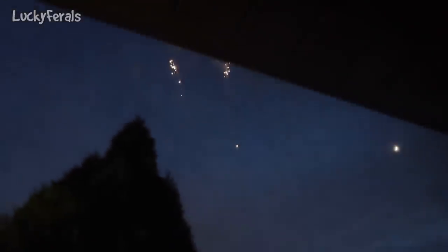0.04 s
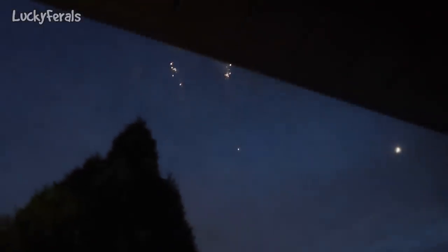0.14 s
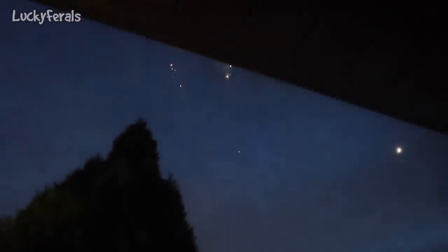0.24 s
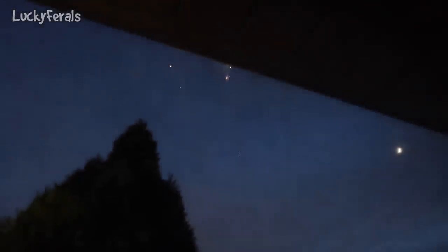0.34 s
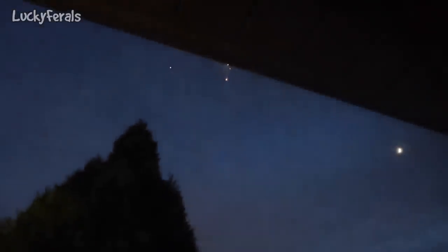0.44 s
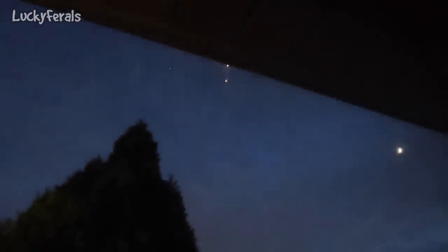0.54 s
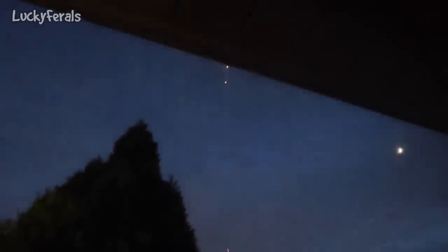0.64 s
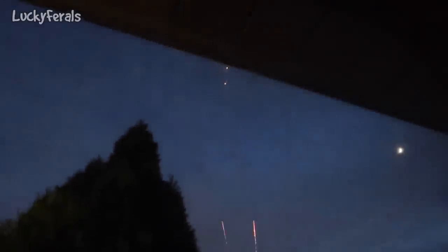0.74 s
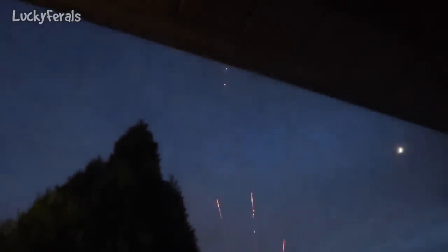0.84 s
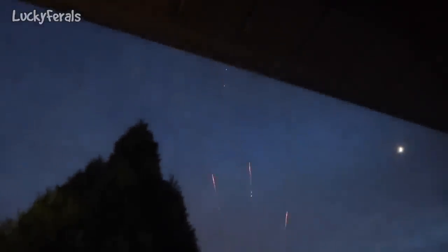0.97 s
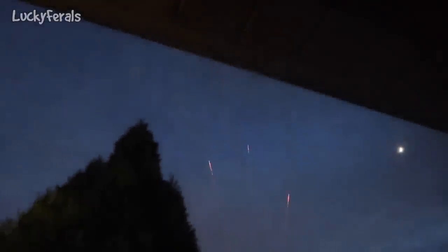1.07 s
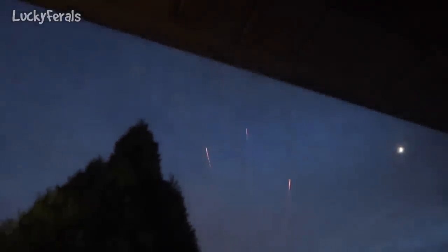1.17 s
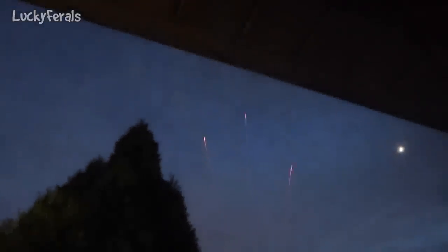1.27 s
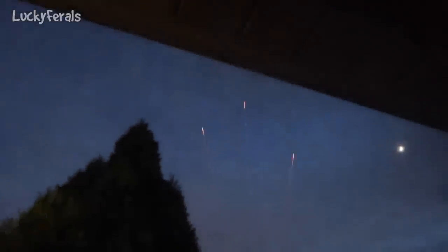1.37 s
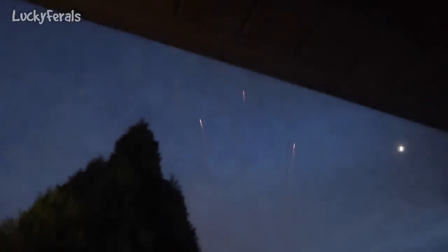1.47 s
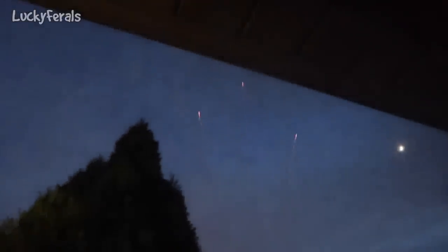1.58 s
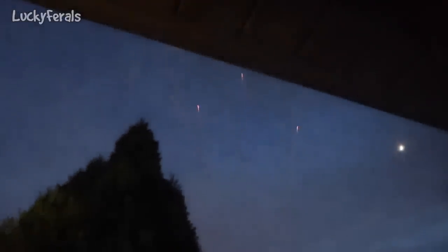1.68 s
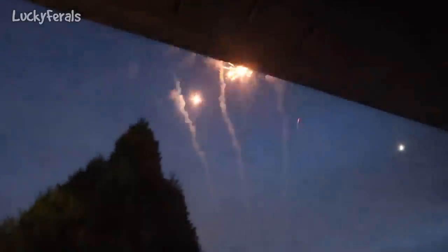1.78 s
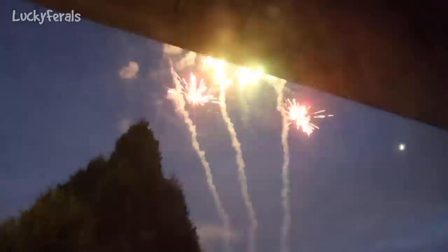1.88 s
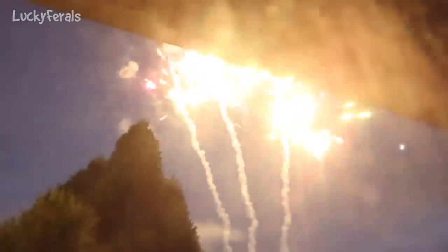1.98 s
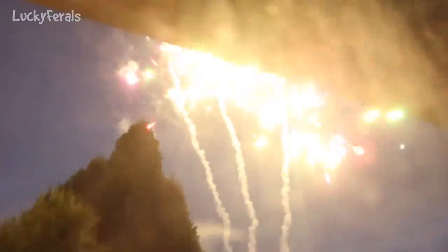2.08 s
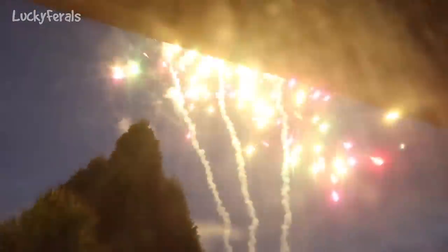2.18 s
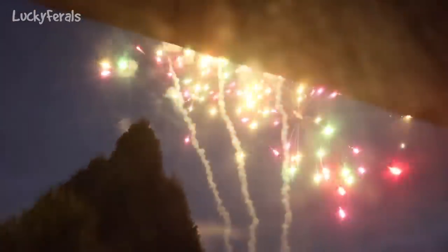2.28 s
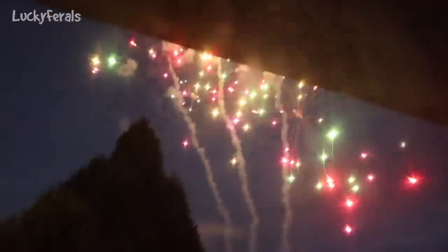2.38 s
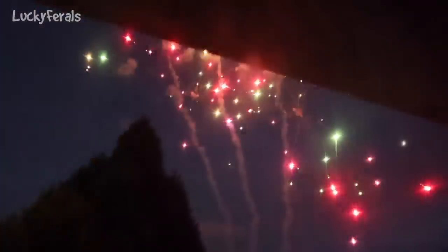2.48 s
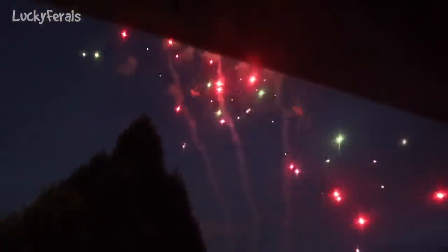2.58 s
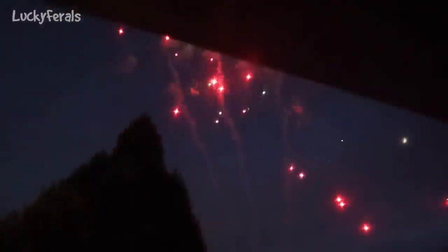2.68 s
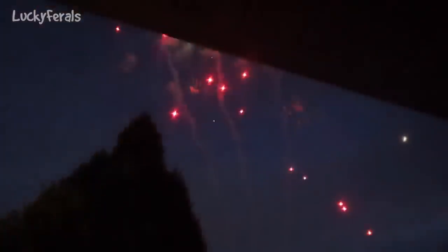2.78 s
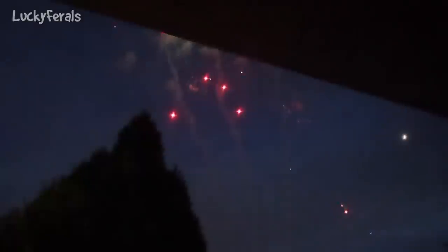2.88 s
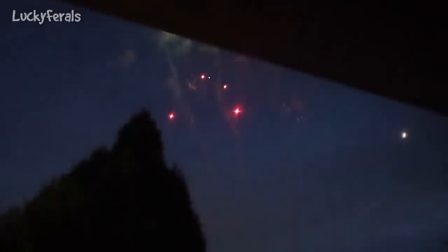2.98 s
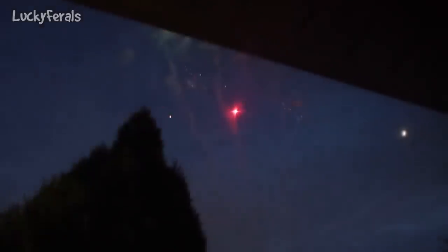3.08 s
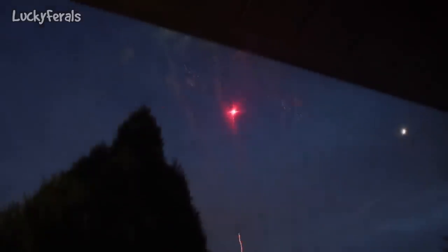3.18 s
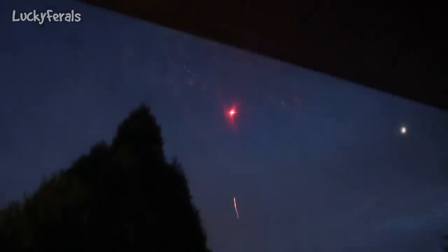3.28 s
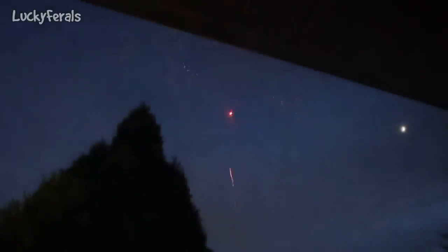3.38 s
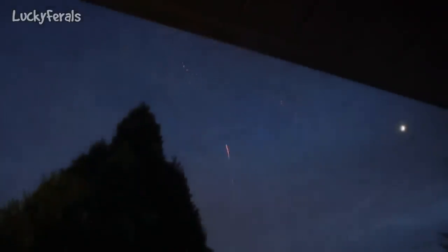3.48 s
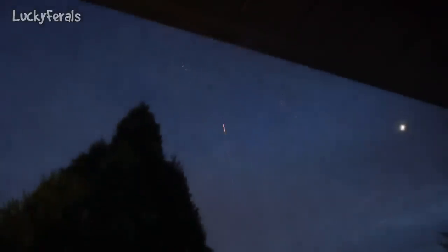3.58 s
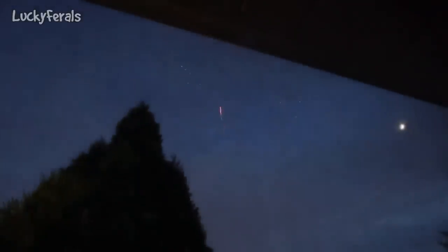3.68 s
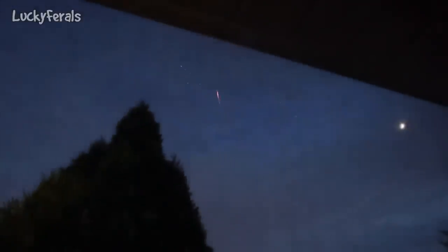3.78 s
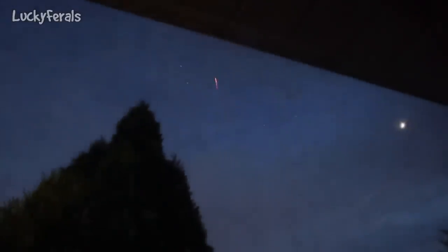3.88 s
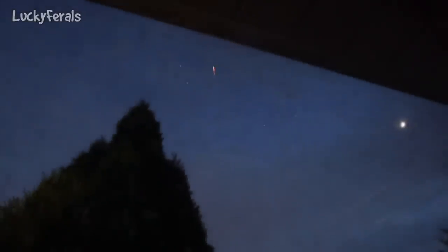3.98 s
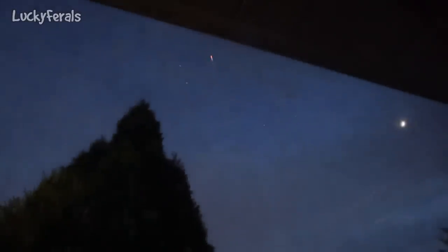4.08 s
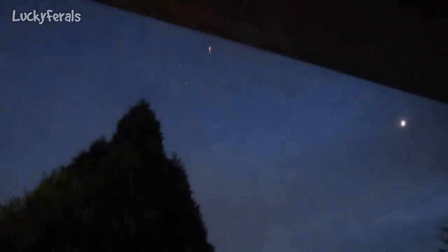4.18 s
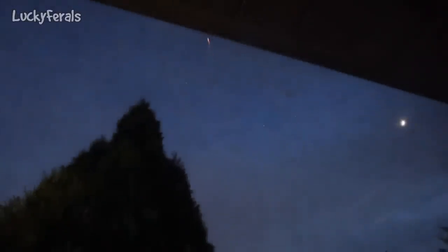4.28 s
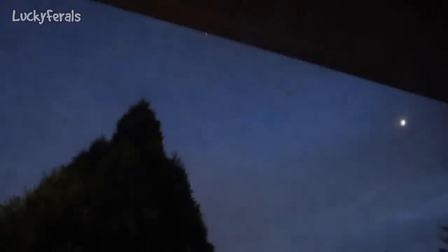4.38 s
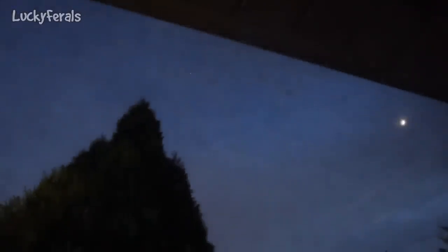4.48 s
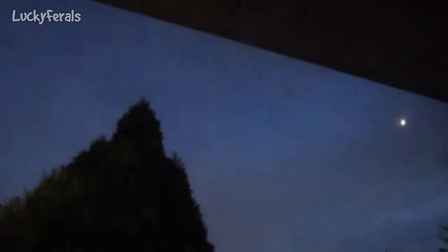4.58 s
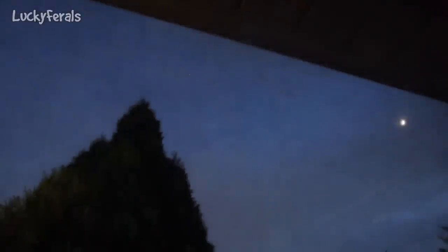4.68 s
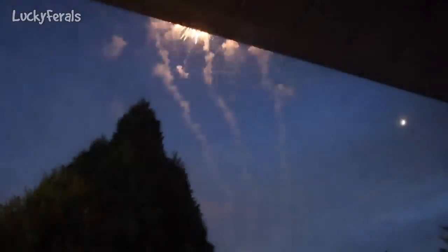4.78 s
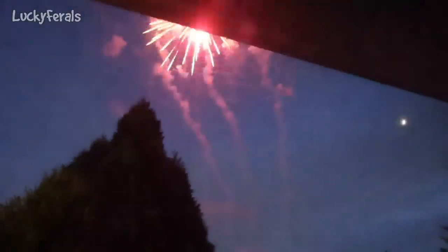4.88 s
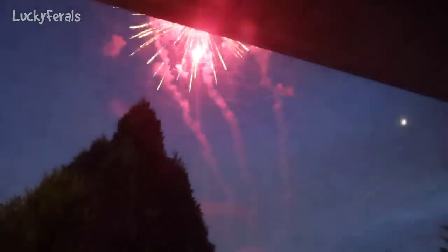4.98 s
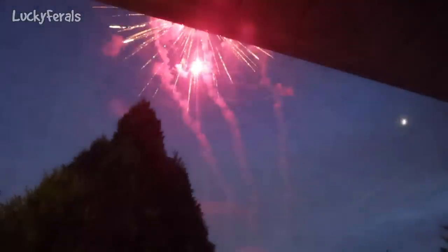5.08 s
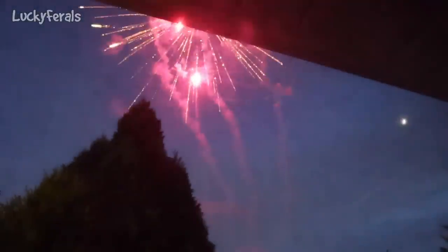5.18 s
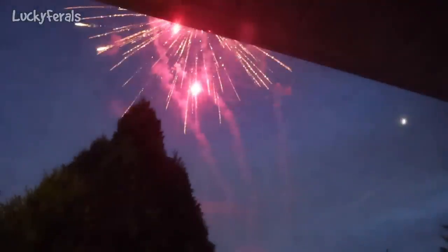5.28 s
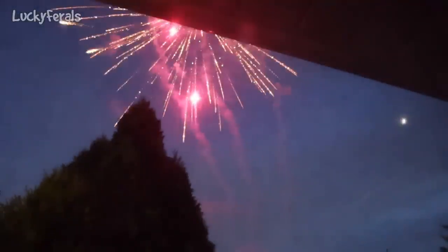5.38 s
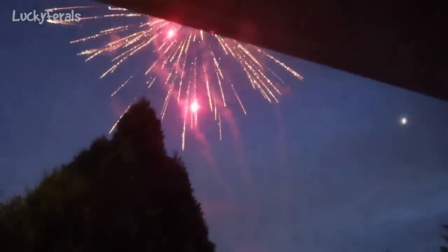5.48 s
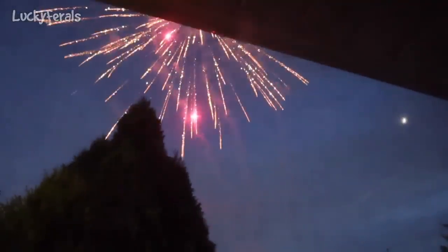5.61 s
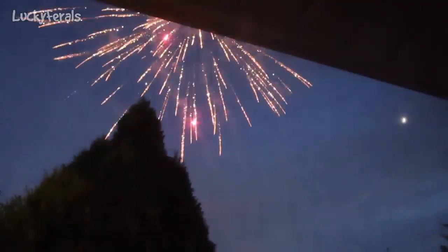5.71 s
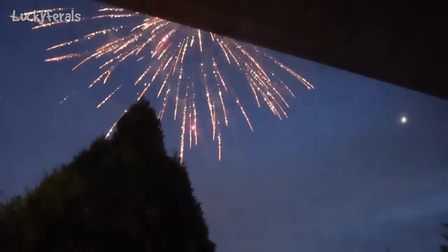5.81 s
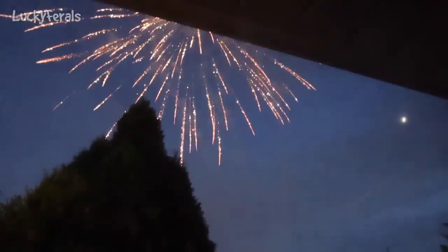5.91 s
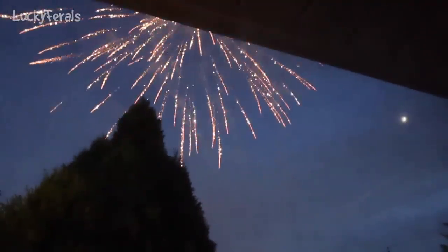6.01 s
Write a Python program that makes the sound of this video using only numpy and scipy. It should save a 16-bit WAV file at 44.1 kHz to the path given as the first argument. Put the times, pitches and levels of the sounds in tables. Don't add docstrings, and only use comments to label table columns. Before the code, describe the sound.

Night fireworks heard from a porch: dull mortar thuds, a sharp twin blast, later a single huge crack, with booming echoes over faint hum and insect ticking.

```python
import sys
import numpy as np
from scipy import signal
from scipy.fft import rfft, irfft
from scipy.io import wavfile
from scipy.ndimage import uniform_filter1d

SR = 44100
rng = np.random.default_rng(int(sys.argv[2]) if len(sys.argv) > 2 else 0)


def wrap_up_sound(samples):
    columns = np.atleast_2d(samples).T
    tamed = np.clip(columns, -1, 1)
    steps = np.round(tamed * 32767).astype(np.int16)
    wavfile.write(sys.argv[1], SR, steps)


def level_to_linear(level):
    exponent = np.asarray(level, float) / 20
    return 10 ** exponent


N = 266805


def evened(x):
    return x / np.sqrt(np.mean(x ** 2) + 1e-20)


def steady(x, size):
    return x / np.sqrt(uniform_filter1d((x ** 2).mean(0), size) + 1e-20)


def smoothed_noise(shape, size, axis=-1):
    return uniform_filter1d(rng.standard_normal(shape), size=size, axis=axis)


def read(points, hz):
    f, value = np.transpose(points)
    return np.interp(np.log(hz + 1), np.log(f + 1), value)


def add(mix, start_s, sound):
    part = mix[..., round(start_s * SR):][..., :sound.shape[-1]]
    part += sound[..., :part.shape[-1]]


def modes(hz, table):
    total = 0
    for k, (f, width, db) in enumerate(table):
        resonance = 1j * hz * width / (f ** 2 - hz ** 2 + 1j * hz * width)
        total = total + (-1) ** k * level_to_linear(db) * resonance
    return total


def lifted(hz, table):
    return np.sqrt(1 + sum(abs(modes(hz, [mode])) ** 2 for mode in table))


def ports(a, b, same, lean, turn=((1, 0), (2, 0))):
    hz = np.fft.rfftfreq(len(a), 1 / SR)
    likeness = np.clip(read(same, hz), -1, 1)
    apart = hz ** 2 / (hz ** 2 + 450 ** 2)
    left = rfft(a)
    right = likeness * left + np.sqrt(1 - likeness ** 2) * rfft(b)
    right = right * np.exp(-1j * apart * read(turn, hz))
    return hz, np.array([left, right]) * level_to_linear(np.outer([.5, -.5], apart * read(lean, hz)))


# pitch_hz, level_db per Hz
NIGHT_COLOUR = [(15, -27), (28, -0.5), (130, -3), (200, -9.5), (560, -15), (3500, -25), (14500, -42.5),
                (16000, -43)]
# pitch_hz, likeness
NIGHT_LIKENESS = [(60, 1), (150, 0.93), (380, 0.16), (950, 0.015), (2380, 0.14), (5980, 0.53),
                  (15000, 0.35)]
# pitch_hz, left_minus_right_db
NIGHT_BALANCE = [(60, -8), (240, 1), (950, 0.5), (3770, 0), (15000, 0.0)]
# pitch_hz, width_hz, level_db
PORCH_HUM_MODES = [(105.4, 31, 6.5), (143, 50, -7.5), (220.7, 18, 8.5), (310, 25, 11), (405, 12, 9.5)]


def night(hum_db=-42.5, swell_db=1.5, hiss_db=-48.5):
    hz, z = ports(*rng.standard_normal((2, N)), NIGHT_LIKENESS, NIGHT_BALANCE)
    z = z * level_to_linear(read(NIGHT_COLOUR, hz)) * lifted(hz, PORCH_HUM_MODES)
    low = 1 / (1 + (hz / 450) ** 4)
    swell = evened(uniform_filter1d(smoothed_noise(N, 3000), size=3000))
    hum = steady(irfft(z * low, N), size=9000) * level_to_linear(hum_db + swell_db * swell)
    hiss = evened(irfft(z * (1 - low), N)) * level_to_linear(hiss_db)
    return hum + hiss


# start_s, pairs
PAIR_RUNS = [
    (.883, 6),
    (3.352, 1),
    (4.285, 2),
    (4.853, 11),
]
LIMP_S = np.array([0, .044, .12, .176, .225, .275])
# start_s, ticks
LIMPS = [(-.089, 6), (.276, 4), (.722, 1), (1.51, 2), (1.644, 4), (1.897, 1), (2.422, 1), (2.511, 2),
         (2.745, 3), (2.879, 4), (3.479, 6), (3.815, 2), (3.946, 6), (4.514, 6)]


def insect(level_db=-45.5, spread_db=2, pair_gap_s=.038, pair_every_s=.1003):
    t = np.arange(400) / SR
    turn = np.array([[2.1], [0]])
    tone = np.sin(2 * np.pi * 4365 * t + turn)
    tone = tone + level_to_linear(-10.5) * np.sin(2 * np.pi * 3410 * t + turn)
    click = tone * np.exp(-((t * 1000 - 4) / 1.63) ** 2)
    times = []
    for start, pairs in PAIR_RUNS:
        for k in range(pairs):
            times += [start + k * pair_every_s, start + k * pair_every_s + pair_gap_s]
    for start, ticks in LIMPS:
        times += [start + after for after in LIMP_S[:ticks] if start + after > 0]
    out = np.zeros((2, N))
    for s in times:
        add(out, s - .0047, level_to_linear(level_db + spread_db * rng.standard_normal()) * click)
    return out * level_to_linear([[1.5], [-1.5]])


def front(db, push_ms, soft_ms, lead_ms=0.1, swings=1.63):
    ms = np.arange(-40, 900) * 1000 / SR

    def wave(at_ms):
        u = np.maximum(at_ms, 0) / push_ms
        swing = np.cos(np.pi / 2 * u) * np.exp(-u / swings)
        return -swing * (1 + np.tanh(at_ms / soft_ms)) / 2

    shares = (0.55, -0.0051)
    return level_to_linear(db) * np.array([(1 + k) * wave(ms) - k * wave(ms + lead_ms) for k in shares])


# start_s, peak_db, push_ms, softness_ms
FRONTS = [(1.9676, 12, 1.08, 0.088), (1.9710, -6, 0.66, 0.064), (1.981, -9, 0.63, 0.084),
          (2.0496, 10, 1.1, 0.063), (2.0547, 2.5, 2.2, 0.17), (2.063, -19, 1.2, 0.2),
          (5.0022, 18.5, 1.48, 0.071), (5.0218, -10, 0.45, 0.13), (0.4942, -7, 1.4, 0.72),
          (0.5423, -15, 0.93, 0.22), (3.1033, -8.5, 1.5, 0.72), (3.113, -12, 1.05, 0.27),
          (2.468, -23, 1.2, 0.17)]


def blasts():
    out = np.zeros((2, N))
    for s, *shape in FRONTS:
        add(out, s - 40 / SR, front(*shape))
    return out


# start_s, level_db, pitch_hz, t60_s
TUBES = [(0.498, -26, 2320, 0.064), (.543, -23, 2280, 0.065), (.545, -30, 2020, 0.082),
         (.575, -27, 2300, 0.076), (0.651, -33, 3100, .08), (3.109, -24.5, 2860, 0.11),
         (3.109, -25.5, 4250, 0.088), (3.111, -33, 5470, 0.033), (3.177, -18.5, 1395, 0.09),
         (3.27, -26.5, 1250, 0.038), (4.345, -32.5, 405, 0.26), (4.345, -38, 310, 0.36),
         (5.02, -24.5, 3080, 0.031)]


def tubes():
    out, t = np.zeros((2, N)), np.arange(6000) / SR
    for s, db, hz, t60 in TUBES:
        wobble = np.cumsum(smoothed_noise(len(t), 60)) * .05
        ring = np.sin(2 * np.pi * hz * t + wobble * hz / 2500)
        ring = ring * level_to_linear(db - 60 * t / t60) * np.minimum(t / .003, 1)
        add(out, s, ring * level_to_linear([[2.5], [-2.5]]))
    return out


def arrival(start, db, rise, t60):
    t = np.arange(0, N, 16) / SR - start
    build_up = np.clip(t / rise, 0, 1) ** 0.48
    return build_up * level_to_linear(2 * (db - 60 * np.maximum(t - rise, 0) / t60))


# start_s, boom_db, rise_s, t60_s, treble_over_boom_db
FIRST_LAUNCH = [
    (.492, -20, 0.032, 1, -14),
    (.545, -18.5, 0.04, 0.73, -11.5),
    (.63, -23, 0.015, 0.54, -14.5),
    (.79, -30.5, .035, 0.28, -22),
    (.96, -41, .02, 0.56, -14.5),
]
SECOND_LAUNCH = [
    (3.1, -14, 0.044, 0.59, -16),
    (3.168, -16.5, 0.039, 0.37, -13.5),
    (3.27, -28.5, 0.012, 0.84, -16.5),
    (3.33, -33, 0.035, 0.59, -21),
    (3.44, -34, 0.022, .5, -15),
    (3.52, -43, .08, 2.9, -15.5),
    (4.33, -42.5, 0.024, .35, -21),
    (4.5, -57, 0.052, 0.53, -22.5),
]
TWIN_SHELLS = [
    (1.967, -6.5, .043, 0.21, -24),
    (2.05, -5.5, 0.034, 0.13, -26.5),
    (2.11, -10, 0.06, 0.31, -23.5),
    (2.17, -22, 0.074, 1.63, -17),
    (2.38, -28.5, 0.016, 0.36, -28),
    (2.46, -28, 0.053, 1.7, -24.5),
    (2.678, -27, 0.041, 0.31, -29),
    (2.77, -37.5, 0.038, 5.8, -25),
]
BIG_SHELL = [
    (5.001, -7.5, 0.014, 0.63, -29),
    (5.04, -15.5, 0.024, 1.04, -24),
    (5.108, -13.5, 0.067, 0.31, -21.5),
    (5.19, -23, 0.093, 1.22, -18),
    (5.345, -28, 0.046, 0.18, -26),
    (5.42, -25, 0.09, 2.47, -27),
    (5.6, -29, 0.034, 0.93, -26),
    (5.98, -38, 0.034, 0.54, -42),
]
# over_boom_db, treble_share, decay_stretch
FOLLOW = [
    [(0, 0.01, 0.75), (-4, 0.76, 1.23), (-0.1, 1, 0.92)],
    [(1, 0.01, 1.47), (-3, 0.65, 0.93), (-0.7, 0.95, 1.12)],
    [(-11.5, 0.01, 2.2), (-3.5, 0.42, 1.34), (-0.2, 0.97, 1.16)],
    [(-6, 0.01, 1.29), (-8.5, 0.38, 0.94), (-0.35, .99, 1.1)],
]
# start_s, treble_db, edge_db
CRACKS = [
    (.495, -29.5, -47),
    (1.969, -20.5, -11),
    (2.049, -14.5, -11.5),
    (3.11, -27, -48),
    (5.001, -21, -19.5),
    (5.023, -26, -27.5),
]


def roll():
    power = [0, 0, 0, 0]
    for rows, layers in zip((FIRST_LAUNCH, SECOND_LAUNCH, TWIN_SHELLS, BIG_SHELL), FOLLOW):
        for s, db, rise, t60, treble_db in rows:
            for k, (over_db, share, stretch) in enumerate([(0, 0, 1)] + layers):
                level_db = db + over_db + share * treble_db
                power[k] = power[k] + arrival(s, level_db, rise, t60 * stretch)
    for s, treble_db, edge_db in CRACKS:
        power[2] = power[2] + arrival(s, edge_db, 0.016, 0.14)
        power[3] = power[3] + arrival(s, treble_db, 0.0017, 0.06)
    return [np.sqrt(p).repeat(16)[:N] for p in power]


# pitch_hz, level_db per Hz
HISS_COLOUR = [(530, -36), (900, -6), (2000, -7.5), (3000, -11), (4500, -19), (7000, -30.5), (9000, -43.5),
               (12000, -59.5)]
# pitch_hz, width_hz, level_db
TRIM_MODES = [(1194, 72, 8), (1457, 54, 2), (1650, 110, -0.5), (2320, 48, -5), (2880, 130, 3.5),
              (2940, 75, -1.5), (4500, 450, 1.5)]


def wall_hiss(hz, z, patchy_db=1.2):
    hiss = irfft(z * level_to_linear(read(HISS_COLOUR, hz)) * lifted(hz, TRIM_MODES), N)
    hiss = signal.stft(hiss, nperseg=256)[2]
    patches = uniform_filter1d(smoothed_noise(hiss.shape[1:], 3, axis=0), size=7, axis=1)
    return signal.istft(hiss * level_to_linear(patchy_db * evened(patches)), nperseg=256)[1][:, :N]


# pitch_hz, width_hz, level_db
BOOM_MODES = [(206.2, 52.5, -6), (230.2, 26.5, -1.5), (288, 40.2, -8), (312.9, 16.2, 0.5),
              (359.8, 19.7, -10.5), (403.8, 10.8, -3.5)]
THUD_MODES = [(47, 18, -8), (99.4, 11.9, 1.5), (153.8, 13.2, -2.5)]
EDGE_MODES = [(499.5, 19.4, 3.5), (563, 14.7, 3.5), (650.6, 29, -2.5), (747.5, 59, -4.5), (901, 42, -11.5)]
# pitch_hz, likeness
ECHO_LIKENESS = [(60, 1.0), (150, 1.0), (380, 0.99), (950, 0.95), (2380, 0.81), (5980, 0.18), (15000, 0.5)]
# pitch_hz, left_minus_right_db
ECHO_BALANCE = [(60, 4), (150, -4), (380, 2), (950, 4), (2380, 3), (5980, 1), (15000, -2.5)]
# pitch_hz, left_lead_radians
ECHO_LEAD = [(0, 0), (2500, 0), (4480, 1.87), (5000, 0.54), (5770, 0.9), (8100, 0.0), (16000, 0.16)]


def echoes(per_s=900, spread_db=4.5, scatter=.63):
    taps = (rng.random((2, N)) < per_s / SR) * rng.choice([-1., 1.], (2, N))
    taps = evened(taps * level_to_linear(spread_db * np.minimum(rng.exponential(1, (2, N)), 3)))
    taps = scatter * rng.standard_normal((2, N)) + (1 - scatter) * taps
    hz, z = ports(*taps, ECHO_LIKENESS, ECHO_BALANCE, ECHO_LEAD)
    dull = z / (1 + (hz / 2500) ** 2)
    layers = [irfft(dull * modes(hz, table), N) for table in (BOOM_MODES, THUD_MODES, EDGE_MODES)]
    layers.append(wall_hiss(hz, z))
    return sum(steady(x, size=2200) * level for x, level in zip(layers, roll()))


def scene():
    return night() + insect() + blasts() + tubes() + echoes()


def top_cut(x):
    return signal.sosfilt(signal.butter(12, 16450, fs=SR, output="sos"), x)


def record(dry):
    x = signal.lfilter(*signal.butter(1, 30.0, "high", fs=SR), dry)
    x = signal.lfilter(*signal.butter(2, 11500.0, fs=SR), np.clip(x, -1, 1))
    return top_cut(x)


dry = scene()
out = record(dry)
wrap_up_sound(out)
```